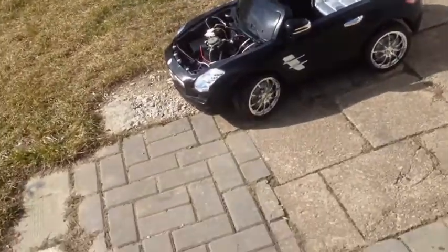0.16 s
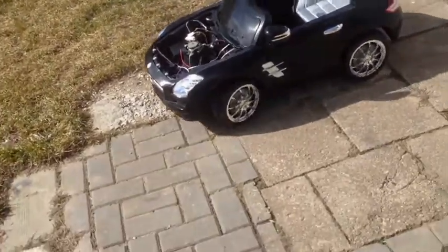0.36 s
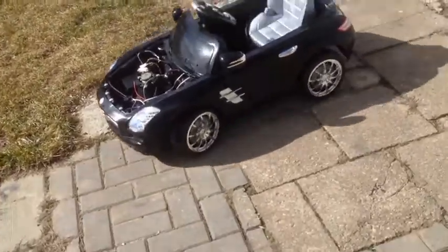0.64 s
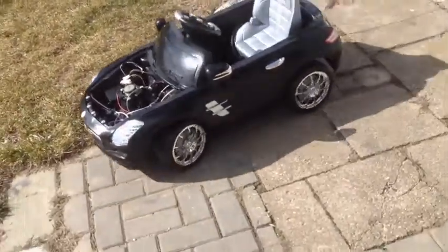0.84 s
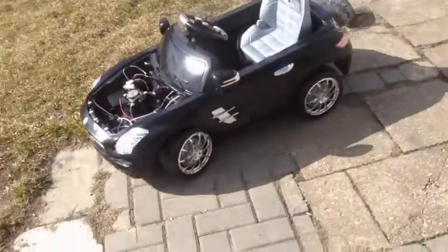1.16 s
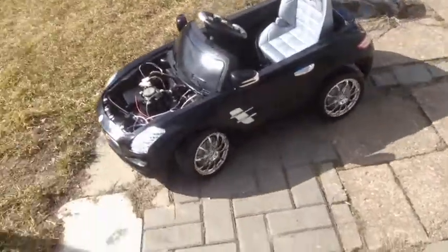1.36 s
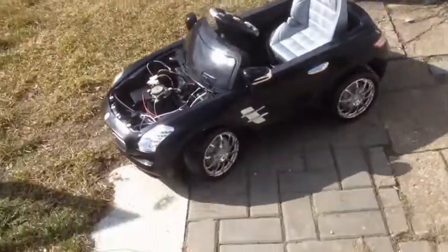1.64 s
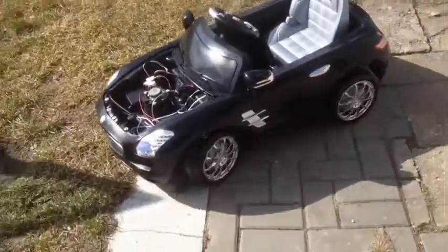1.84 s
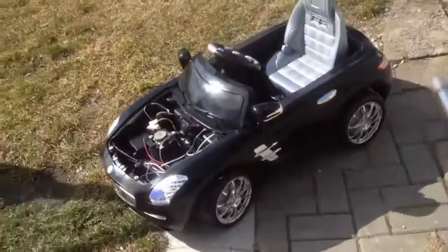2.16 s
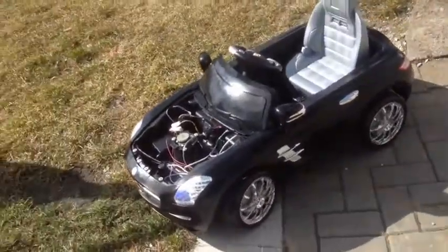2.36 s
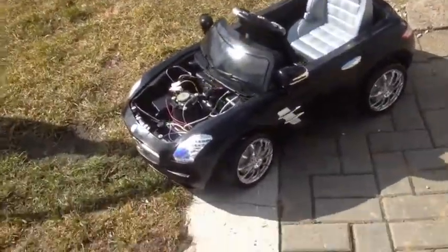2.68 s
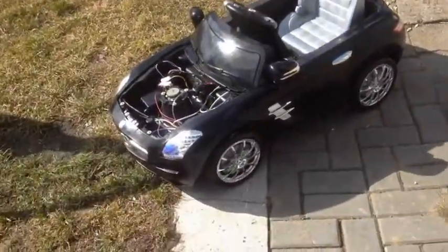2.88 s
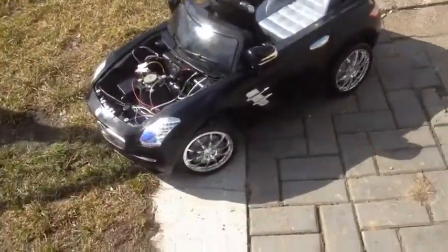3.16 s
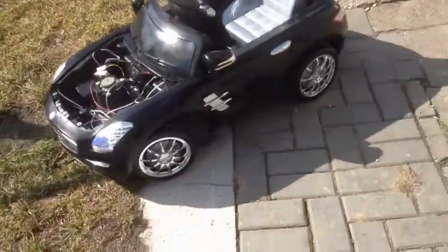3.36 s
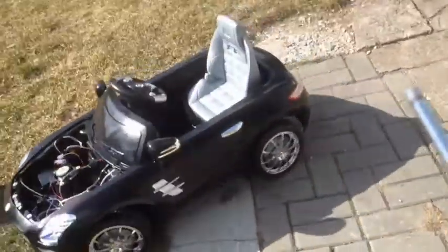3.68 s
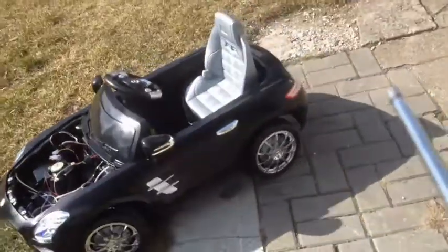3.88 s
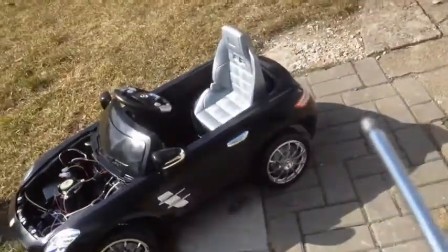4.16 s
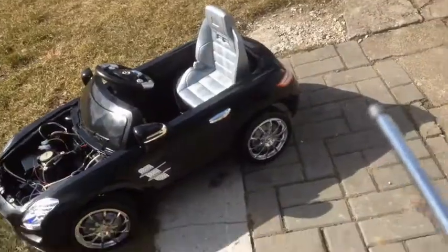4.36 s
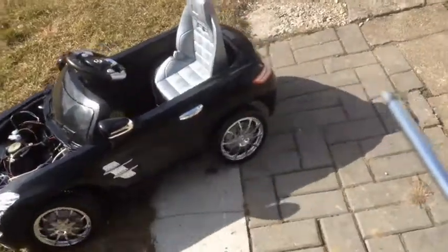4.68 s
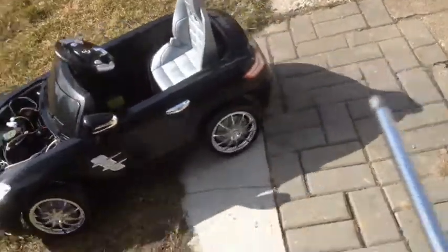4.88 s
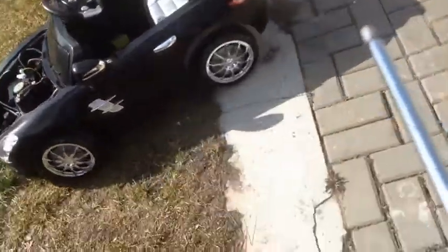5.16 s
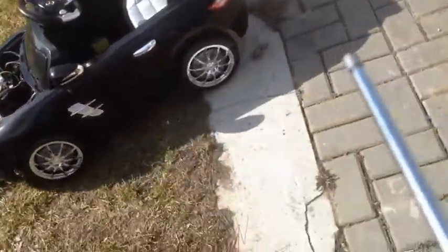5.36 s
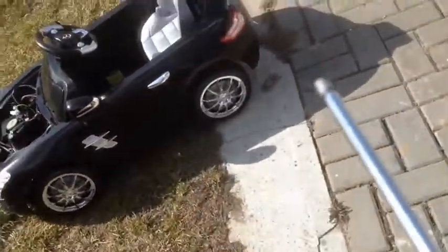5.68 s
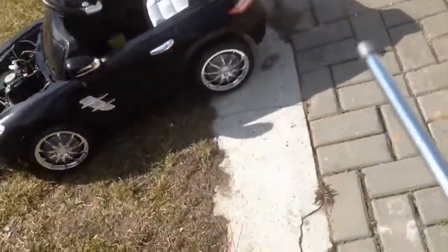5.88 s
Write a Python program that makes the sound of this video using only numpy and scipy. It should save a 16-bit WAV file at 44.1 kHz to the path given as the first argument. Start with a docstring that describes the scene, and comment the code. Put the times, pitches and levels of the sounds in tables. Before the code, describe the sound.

A battery ride-on toy car whines and grinds across paving in bursts, hollow plastic knocking, wheels rumbling, with clicks in the brief pauses.

```python
"""A battery ride-on toy car shunts over paving slabs and grass in a yard, close to the microphone.
From the start noisy gears grind, hollow wheels rumble and faint yard noise lies beneath; plastic knocks.
Motor whines, built from multiples of a gliding tooth rate, mostly climb; axles squeal as falling sines.
The first run stops near 2 s; noise-burst clicks tick around the stops and starts of two shorter runs,
with metal pings of decaying sines at 3.3 and 5 s. A fourth run is still rolling at the end."""
import sys
import numpy as np
from scipy import signal
from scipy.fft import rfft, irfft, next_fast_len
from scipy.io import wavfile
from scipy.ndimage import uniform_filter1d

SR = 44100
rng = np.random.default_rng(int(sys.argv[2]) if len(sys.argv) > 2 else 0)


def digitize_waveform(pressure):
    """Quantize a signal to 16-bit integers and store it at the path in sys.argv[1].

    Rows of a 2-D input are taken as channels; values are limited to [-1, 1].
    """
    field = np.atleast_2d(pressure).T
    bounded = np.clip(field, -1, 1)
    quanta = np.round(bounded * 32767).astype(np.int16)
    wavfile.write(sys.argv[1], SR, quanta)


N = 265476  # about 6 s


def gain_of(db):
    """Amplitude factor of a level in dB."""
    return 10 ** (np.asarray(db) / 20)


def evened(x):
    """Brings a sound to rms 1."""
    return x / np.sqrt(np.mean(x ** 2) + 1e-20)


def read(points, hz):
    """Reads a curve of (f/Hz, level/dB) along a logarithmic frequency axis."""
    f, value = np.transpose(points)
    return np.interp(np.log(hz + 1), np.log(f + 1), value)


def add(mix, s, sound):
    """Lays a sound into the mix from s seconds on, cut at the end."""
    part = mix[round(s * SR):][:len(sound)]
    part += sound[:len(part)]


def resonate(x, hz, width):
    """A fixed resonance, passed twice for steep sides, with gain 1 at its centre."""
    b, a = signal.iirpeak(hz, hz / width, SR)
    once = signal.lfilter(b, a, x)
    return signal.lfilter(b, a, once)


def coloured(x, points):
    """Shapes the spectrum of a long sound and brings it to rms 1."""
    size = next_fast_len(len(x))
    curve_db = read(points, np.fft.rfftfreq(size, 1 / SR))
    shaped = irfft(rfft(x, size) * gain_of(curve_db), size)
    return evened(shaped[:len(x)])


def wander(seconds, count=N):
    """Slow chance of rms 1: noise averaged twice over the given time."""
    size = max(int(seconds * SR), 2)
    smooth = uniform_filter1d(rng.standard_normal(count), size)
    return evened(uniform_filter1d(smooth, size))


def grit(per_s, spread_db, share):
    """Noise mixed with sparse ticks of uneven size."""
    size_db = spread_db * np.minimum(rng.exponential(1, N), 5)
    size = gain_of(size_db) * rng.standard_normal(N)
    ticks = size * (rng.random(N) < per_s / SR)
    return np.sqrt(1 - share ** 2) * rng.standard_normal(N) + share * evened(ticks)


def gritty(turns, db, rough=.5):
    """A thin line with a near and a wide noisy skirt, swelling and fading."""
    count = len(turns)
    skirt = 1 + rough * (.6 * wander(.002, count) + wander(.0004, count))
    swell = gain_of(db + 1.0 * wander(0.064, count))
    return np.sqrt(2) * swell * skirt * np.sin(2 * np.pi * turns)


# how hard the car drives, one list a run: (t/s, motor level/dB, rolling level/dB)
DRIVING_RUNS = [
    [(0, -36, -35), (.13, -42, -44.5), (.27, -34, -35), (.42, -36.5, -30), (.6, -35.5, -36),
     (.75, -37, -39), (1.1, -36, -39), (1.16, -38.5, -39.5), (1.22, -36.5, -28), (1.37, -39, -41),
     (1.56, -32, -33), (1.68, -36, -41.5), (1.75, -39.5, -38), (1.91, -45.5, -43), (2.04, -56.5, -53)],
    [(2.44, -58.5, -47), (2.6, -44.5, -46), (2.69, -44, -38.5), (2.73, -37, -34), (2.85, -34, -33.5),
     (2.95, -39.5, -42), (3.12, -38.5, -44), (3.27, -39, -38.5), (3.5, -52, -46.5)],
    [(4.149, -37.5, -37), (4.3, -41.5, -46), (4.5, -40, -42), (4.629, -39, -47), (4.66, -48, -45.5),
     (4.94, -51, -47), (5.05, -58.5, -41), (5.14, -75, -53)],
    [(5.489, -43, -37), (5.65, -46.5, -58), (5.87, -44, -42.5), (6.02, -38.5, -49)],
]
REST_MOTOR_DB, REST_ROLL_DB = -73.5, -62  # between runs
PICKUP_S, RUNOUT_S = 0.038, 0.15  # from rest into a run, and back to rest


def levels():
    """Motor and rolling level: the runs, joined by quiet rests."""
    rest = REST_MOTOR_DB, REST_ROLL_DB
    rows = []
    for run in DRIVING_RUNS:
        rows += [(run[0][0] - PICKUP_S, *rest), *run, (run[-1][0] + RUNOUT_S, *rest)]
    s, motor_db, roll_db = np.transpose(rows)
    t = np.arange(N) / SR
    return np.interp(t, s, motor_db), np.interp(t, s, roll_db)


# spectrum of the chattering gear teeth: (f/Hz, relative level per Hz/dB)
GEAR_SPECTRUM = [(820, -16), (1400, 9), (2410, 4), (2630, -1), (2870, 11), (3820, 11), (5140, 5.5),
                 (5690, -4), (6190, 3), (9000, -38), (11700, -50), (19800, -120)]
# resonances of the gear casing: (f/Hz, width/Hz, relative level/dB)
CASING_MODES = [(2263, 90, 7), (2575, 490, 6), (2703, 65, 3), (3140, 19, 11), (3415, 310, 2.5),
                (3704, 157, 9), (3915, 130, 0.5), (4660, 160, -1), (5736, 580, -0.5), (6600, 290, -1.5)]
# spectrum of the wheels on the ground: (f/Hz, relative level per Hz/dB)
WHEEL_SPECTRUM = [(24, -79), (40, -60), (102, -23), (143, 2.5), (234, 1.5), (713, -0.5), (826, -32),
                  (1290, -32), (2000, -6.5), (2600, -43), (4400, -120)]
# spectrum of the motor brushes: (f/Hz, relative level per Hz/dB)
BRUSH_SPECTRUM = [(5000, -29), (7000, 12.5), (9000, 2.5), (10500, -3), (14000, -2)]
# modes of the hollow plastic body, also rung by the knocks: (f/Hz, relative level/dB, t60/s)
BODY_MODES = [(184, -3.5, 0.029), (255.7, 9, 0.057), (306, 9, 0.18), (370, 7.5, 0.043), (419, 8.5, 0.035),
              (518, 1, 0.02), (721, -1.5, 0.027)]
HISS_DB, HISS_FOLLOW = -10.5, 1.174  # brushes: offset from the motor's peak level, dB per motor dB
RATTLE_DB, RATTLE_MOTOR_SHARE = -4, 0.021  # panels follow mostly the rolling level


def drive():
    """Gear teeth chatter in their casing, wheels rumble in lumps, brushes hiss, panels rattle."""
    grind_db, rumble_db = levels()
    hiss_db = grind_db.max() + HISS_DB + HISS_FOLLOW * (grind_db - grind_db.max())
    rattle_db = RATTLE_DB + rumble_db + RATTLE_MOTOR_SHARE * (grind_db - rumble_db)
    load = wander(0.024)  # uneven ground shakes all parts together

    teeth = grit(per_s=900, spread_db=0.5, share=0.54)
    casing = sum(gain_of(db + 4.5 * wander(.02)) * resonate(teeth, hz, width)
                 for hz, width, db in CASING_MODES)
    gears = evened(coloured(teeth, GEAR_SPECTRUM) + 0.52 * evened(casing))
    grind = gears * gain_of(grind_db + 0.5 * load)

    road = grit(per_s=180, spread_db=-0.5, share=0.43)
    # under steady rolling the body modes share one width of 73 Hz
    hollow = sum(gain_of(db + 3 * wander(.025)) * resonate(road, hz, 73.0)
                 for hz, db, _ in BODY_MODES)
    wheels = evened(coloured(road, WHEEL_SPECTRUM) + 0.45 * evened(hollow))
    rumble = wheels * gain_of(rumble_db + 2.0 * load)

    rattle = evened(resonate(road, 1104, 1170)) * gain_of(rattle_db + 2.5 * load)
    brushes = coloured(grit(per_s=930, spread_db=6.5, share=0.3), BRUSH_SPECTRUM)
    hiss = brushes * gain_of(hiss_db + load)
    return grind + rumble + rattle + hiss


# spectrum of the quiet yard: (f/Hz, relative level per Hz/dB)
YARD_SPECTRUM = [(18, -55), (40, -24.5), (133, -1.5), (190, -8), (300, -11), (450, -14), (700, -16.5),
                 (945, -19.5), (1200, -16), (3000, -21.5), (15500, -45)]
YARD_DB = -60


def yard_noise():
    """Faint shaped noise of the place, its level wandering."""
    return coloured(rng.standard_normal(N), YARD_SPECTRUM) * gain_of(YARD_DB + 2.2 * wander(0.031))


# thin motor notes beside the main whine, and a faint hum at rest:
# (start t/s, end t/s, start f/Hz, end f/Hz, level/dB)
MOTOR_NOTES = [(0, 0.04, 3090, 3190, -44), (.004, 0.033, 2840, 2740, -41),
               (0.057, 0.114, 1392, 1360, -43.5), (0.203, 0.266, 1328, 1365, -43),
               (3.077, 3.197, 3430, 3480, -43), (3.601, 3.902, 1140, 1160, -62.5),
               (3.602, 3.975, 557, 550, -69.5), (4.155, 4.199, 1480, 1538, -40.5),
               (4.251, 4.374, 1040, 1152, -42.5), (4.263, 4.378, 2150, 2440, -43),
               (4.217, 4.267, 2830, 3000, -37), (4.35, 4.51, 2960, 3080, -48),
               (4.421, 4.487, 3050, 3114, -39), (4.532, 4.632, 3390, 3400, -43.5),
               (4.608, 4.642, 2702, 2623, -34), (4.782, 4.89, 2885, 2960, -52),
               (4.81, 4.97, 3540, 3480, -62), (4.897, 4.965, 3180, 3030, -50.5),
               (5.494, 5.646, 1572, 1610, -46), (5.697, 5.779, 1464, 1512, -43)]


def tone(start, end, from_hz, to_hz, db):
    """A held or slowly gliding note; the more it glides the rougher it is."""
    hz = np.linspace(from_hz, to_hz, round((end - start) * SR))
    rough = np.clip(abs(to_hz / from_hz - 1) * 20, .3, .8)
    note = gritty(np.cumsum(hz) / SR, db, rough)
    return start, note * signal.windows.tukey(len(hz), .3)


# wheels and body knocking: (t/s, peak level of the body ring/dB, edge level against the ring/dB, t60/s)
BODY_KNOCKS = [(0.042, -24.5, -12, 0.11), (0.153, -28, 5, 0.095), (0.214, -22.5, -18, 0.17),
               (0.29, -11, -3.5, 0.065), (0.365, -21, -22, 0.4), (0.39, -21, -1.5, 0.072),
               (0.417, -17.5, -10, 0.1), (0.453, -17, -21, 0.12), (0.513, -17.5, -14, 0.25),
               (0.565, -10.5, -2.5, 0.13), (0.679, -23.5, -2.5, 0.16), (1.167, -22, -3.5, 0.15),
               (1.184, -21, 3, 0.08), (1.1925, -14.5, -1, 0.05), (1.2025, -15, 0, 0.057),
               (1.24, -18.5, -12, 0.33), (1.399, -17.5, -4, 0.16), (1.434, -17, -11, 0.12),
               (1.463, -25.5, -7, 0.061), (1.514, -18.5, -8, 0.058), (1.747, -21, -6, 0.12),
               (1.8, -22.5, -1, 0.12), (1.851, -21, -5.5, 0.071), (2.434, -43, 6, 0.14),
               (2.621, -31, 5, 0.17), (2.711, -15.5, -8, 0.027), (2.777, -20, -11, 0.086),
               (2.837, -17, -9, 0.11), (2.888, -26.5, -25, 0.057), (3.27, -23, 2, 0.13),
               (3.303, -24, 0.5, 0.061), (4.113, -36.5, 4, 0.5), (4.598, -25, -4, 0.084),
               (4.684, -25, 0, 0.17), (4.702, -25, 4.5, 0.075), (4.819, -33.5, 2, 0.16),
               (4.84, -21, -5, 0.049), (4.85, -31, 4, 0.1), (4.991, -25, 4.5, 0.14), (5.049, -44, 8, 0.029),
               (5.152, -43.5, 3.5, 0.075), (5.485, -36, 4, 0.21)]


def knock(s, db, bright_db, t60):
    """Hard contacts ring hollow plastic; bright blows favour the upper modes, the edge dies sooner."""
    t = np.arange(9000) / SR
    fade = gain_of(-60 * t / t60) * np.minimum(t / 0.0014, 1)
    chatter = 1 + 9 * (rng.random(len(t)) < 250 / SR)  # loose parts chatter
    blow = rng.standard_normal(len(t)) * chatter * fade
    # the first contact is hardest
    blow += 9 * signal.unit_impulse(len(t), idx=40) + 1.85 * blow * gain_of(-60 * t / 0.012)
    second_s = rng.uniform(0.00386, .009)
    blow = blow + 0.42 * np.pad(blow, (round(second_s * SR), 0))[:len(t)]

    ring = 0
    for k, (hz, mode_db, ring_s) in enumerate(BODY_MODES):
        off_db, shift = rng.standard_normal(2) * [2.5, .05]  # each blow lands elsewhere
        tilt_db = 0.13 * bright_db * np.log2(hz / 300)
        mode = resonate(blow, hz * (1 + shift), 7.7 / ring_s)
        ring = ring + (-1) ** k * gain_of(mode_db + off_db + tilt_db) * mode

    edge = resonate(blow, 1062, 760) + 0.75 * resonate(blow, 1578, 203)
    edge = (edge + 0.39 * resonate(blow, 2650, 1060)) * gain_of(-90 * t)
    return s, gain_of(db) * (ring / abs(ring).max() + gain_of(bright_db) * edge / abs(edge).max())


# motor whine, one list a surge:
# (t/s, tooth rate f/Hz, base level/dB, lean to the upper multiples/dB per multiple)
MOTOR_SURGES = [
    [(.065, 1105, -54, -7), (.09, 1123, -38.5, -2), (.135, 1125, -49, -13), (.16, 1210, -39.5, -4),
     (.178, 1315, -43.5, -5), (.2, 1329, -39, -8), (.215, 1335, -53, -11), (.235, 1470, -59, 4),
     (.27, 1510, -60, 3)],
    [(2.89, 1364, -37, -6), (2.91, 1326, -39, 6), (2.94, 1132, -40, -6.5), (2.975, 1086, -39.5, 0),
     (3.0, 1214, -43.5, 7.5), (3.035, 1326, -37, -4), (3.08, 1353, -40, 7), (3.105, 1357, -36.5, 7.5),
     (3.125, 1427, -46, 8), (3.155, 1518, -47, 7.5), (3.19, 1537, -44, 5.5), (3.21, 1634, -47, 2.5),
     (3.24, 1630, -38, 10.5)],
    [(4.26, 1265, -42, 9), (4.29, 1236, -44, 8.5), (4.305, 1114, -37.5, 3), (4.325, 1012, -39, 3),
     (4.34, 1002, -40.5, 1.5), (4.385, 1152, -37, 3), (4.41, 1208, -42.5, 4), (4.45, 1228, -40, 1),
     (4.48, 1302, -37, 5), (4.545, 1347, -34, 3.5), (4.562, 1420, -42, 9), (4.62, 1496, -44, 6.5),
     (4.645, 1520, -66, -9)],
    [(4.74, 1014, -61, -22), (4.765, 1274, -58, -13), (4.8, 1270, -56.5, -12), (4.85, 1160, -64, -14)],
    [(.69, 592, -46, -2), (.8, 588, -46.5, -2), (.93, 588, -50, -11)],
    [(5.48, 728, -42, 1.5), (5.545, 731, -46, -4.5), (5.565, 734, -37, -1.5), (5.605, 775, -46.5, -1),
     (5.64, 767, -39.5, 0), (5.685, 793, -41, -3), (5.71, 868, -44.5, 1), (5.775, 889, -40.5, -1),
     (5.79, 924, -44.5, 1), (5.845, 996, -44, 0.5), (5.86, 1069, -41, -3), (5.955, 1102, -40.5, -7.5),
     (5.966, 1090, -42, -14.5), (5.976, 1285, -35.5, 1.5), (6.02, 1331, -32, 11.5)],
]
# 1st to 7th multiple of the tooth rate: (relative level/dB)
MULTIPLE_LEVELS = [-2.5, 0.5, -5, -10, -22, -11, -27]
# how well the gearbox radiates each pitch: (f/Hz, gain/dB)
GEARBOX_RADIATION = [(700, -3), (900, -1.5), (1100, 1.5), (1350, 2.5), (1500, 5), (1750, -2), (1950, -25),
                     (2250, 4.5), (2450, 3), (2700, 4.5), (3050, 13.5), (3300, 9.5), (3500, 5), (3750, 0.5),
                     (4100, -7), (4600, -45), (5600, -9.5), (6600, -3.5), (8000, -18.5), (9400, -1),
                     (11000, -18)]
DROPOUT_DB = 3.2  # scales how deeply each multiple fades out now and then
HALVES_DB = -10  # uneven teeth add weaker lines halfway between the multiples


def surge(rows):
    """Multiples and halves of the tooth rate tremble, fade, and swell at the gearbox resonances."""
    s, *columns = np.transpose(rows)
    t = np.arange(s[0], s[-1], 1 / SR)
    hz, db, lean_db = (np.interp(t, s, c) for c in columns)
    turns = np.cumsum(hz * (1 + 0.009 * wander(0.012, len(t)))) / SR
    whole = list(enumerate(MULTIPLE_LEVELS, 1))
    halves = [(k - .5, share_db + HALVES_DB) for k, share_db in whole[:5]]
    lines = 0
    for k, share_db in whole + halves:
        tilt_db = (np.clip(k, 1, 4) - 2) * lean_db
        dropout_db = DROPOUT_DB * wander(.02, len(t)) ** 2
        line_db = db + share_db + tilt_db + read(GEARBOX_RADIATION, k * hz) - dropout_db
        lines = lines + gritty(k * turns, line_db, rough=.25 + .07 * k)
    return s[0], lines * signal.windows.tukey(len(t), .1)


# short squeals of the axles: (t/s, peak level/dB, f/Hz)
AXLE_SQUEALS = [(0.429, -33.5, 3770), (0.614, -33.5, 3780), (1.497, -29.5, 4080), (1.534, -34, 3720),
                (2.745, -34, 6460), (2.909, -29.5, 3610), (4.141, -31.5, 2980), (4.193, -26.5, 3130),
                (4.601, -44, 2970)]
SQUEAL_S = 0.038


def squeal(s, db, hz):
    """A brief whistle, a sine falling from just above its pitch to just below."""
    t = np.arange(0, SQUEAL_S, 1 / SR)
    turns = np.cumsum(hz * (1.02 - 1.4 * t)) / SR
    return s, gain_of(db) * np.hanning(len(t)) * np.sin(2 * np.pi * turns)


# small clicks of relays and trim: (t/s, peak level/dB, centre f/Hz, t60/s)
RELAY_CLICKS = [(1.962, -26.5, 4270, 0.016), (2.118, -48, 4450, 0.051), (2.27, -40, 4560, 0.0068),
                (2.297, -46, 4000, 0.02), (2.3257, -48, 4480, 0.03), (2.4344, -31.5, 3900, 0.053),
                (2.46, -39, 6000, 0.026), (2.5607, -25, 7640, 0.037), (2.613, -26.5, 3540, 0.13),
                (2.646, -23.5, 6500, 0.063), (3.3282, -18.5, 6150, 0.1), (3.382, -30.5, 6200, 0.24),
                (3.48, -32.5, 6000, 0.078), (3.51, -34, 6460, 0.047), (3.741, -39, 4320, 0.036),
                (3.9812, -29, 4370, 0.011), (3.99, -38, 2510, 0.01), (4.0265, -32, 4000, 0.032),
                (4.093, -44, 4970, 0.015), (4.115, -30.5, 9100, 0.041), (4.7047, -25, 2940, 0.19),
                (4.992, -34, 4550, 0.11), (5.2019, -26.5, 2620, 0.038), (5.251, -42, 4000, 0.02),
                (5.3397, -37, 4350, 0.056), (5.455, -28, 7360, 0.049)]
SIZZLE_DB = -19


def click(s, db, hz, t60):
    """A hard noise tick ringing around one centre, with a little sizzle on top."""
    t = np.arange(4000) / SR
    snap = rng.standard_normal(len(t)) * gain_of(-60 * t / t60)
    sizzle = gain_of(SIZZLE_DB) * resonate(snap, 11000, 4900)
    sound = sizzle + resonate(snap, hz, 0.29 * hz) + 0.84 * resonate(snap, 1660, 3700)
    return s, gain_of(db) * sound / abs(sound).max()


# a metal part is jolted: (t/s, level of the blow/dB)
METAL_JOLTS = [(3.27, 3.5), (4.997, 0)]
# modes of that part: (f/Hz, level before the blow's own/dB, t60/s)
METAL_MODES = [(6200, -42, 0.054), (7400, -46, 0.1), (9050, -51, 0.05), (10600, -51, 0.04),
               (13700, -53, 0.21)]


def ping(s, blow_db):
    """Short metal modes, each a decaying sine."""
    t = np.arange(12000) / SR
    return s, sum(gain_of(blow_db + db - 60 * t / t60) * np.sin(2 * np.pi * hz * t)
                  for hz, db, t60 in METAL_MODES)


GROUND_HZ, GROUND_WIDE_HZ, GROUND_SHARE = 1875, 403, 0.31


def off_paving(car):
    """The echo off the paving partly cancels one band."""
    return car - GROUND_SHARE * resonate(car, GROUND_HZ, GROUND_WIDE_HZ)


def scene():
    """The car with all its single sounds, heard close by in the quiet yard."""
    car = drive()
    for play, table in ((tone, MOTOR_NOTES), (knock, BODY_KNOCKS), (squeal, AXLE_SQUEALS),
                        (click, RELAY_CLICKS), (ping, METAL_JOLTS)):
        for row in table:
            add(car, *play(*row))
    for rows in MOTOR_SURGES:
        add(car, *surge(rows))
    # a small body gives no deep bass
    car = signal.sosfilt(signal.butter(4, 138, "high", fs=SR, output="sos"), car)
    return (off_paving(car) + yard_noise())[None]


EDGE_HZ = 15350


def record(dry):
    """The microphone's band limit: a steep low-pass takes away the top treble."""
    low_pass = signal.firwin(511, EDGE_HZ, window=("kaiser", 9), fs=SR)
    return signal.oaconvolve(dry, low_pass[None], "same")


dry = scene()
out = record(dry)
digitize_waveform(out)
```